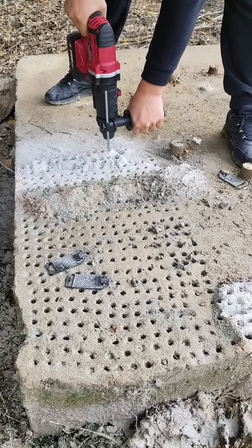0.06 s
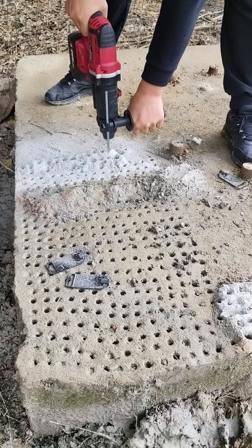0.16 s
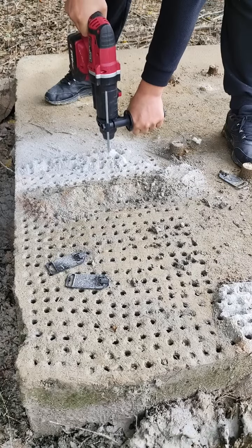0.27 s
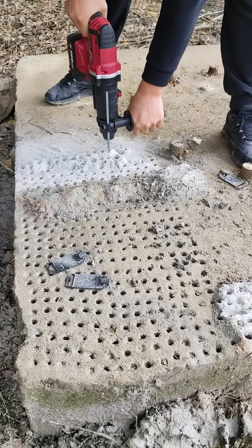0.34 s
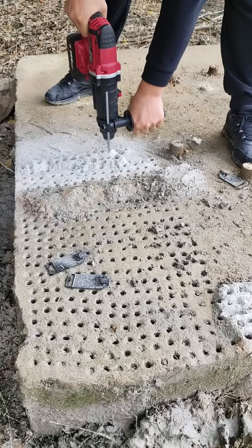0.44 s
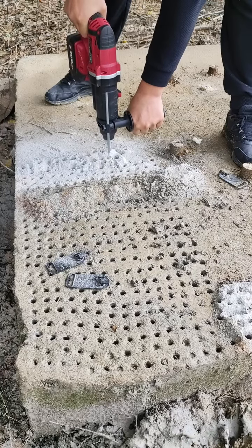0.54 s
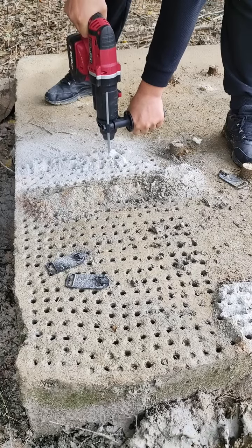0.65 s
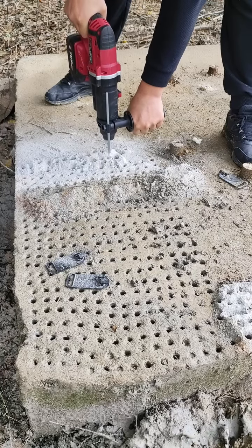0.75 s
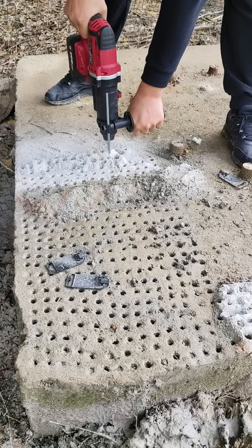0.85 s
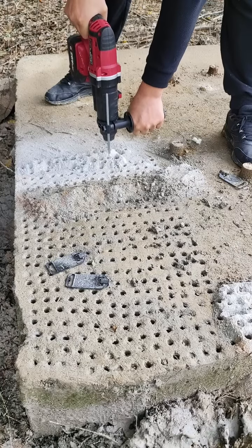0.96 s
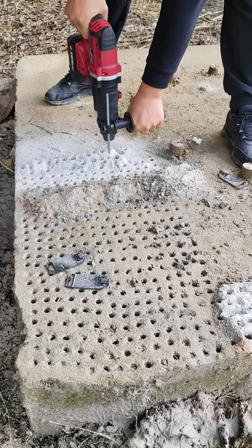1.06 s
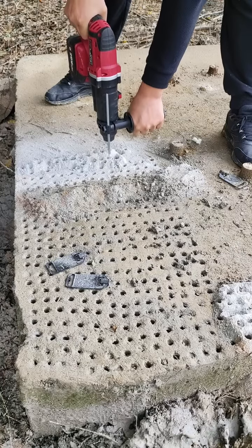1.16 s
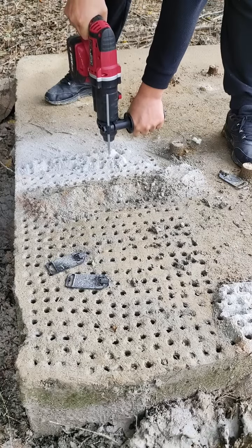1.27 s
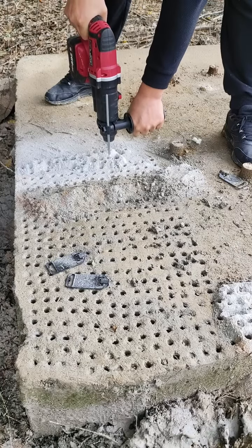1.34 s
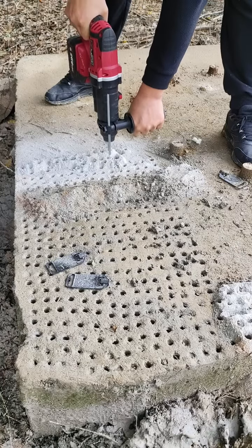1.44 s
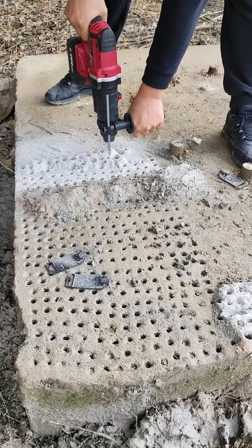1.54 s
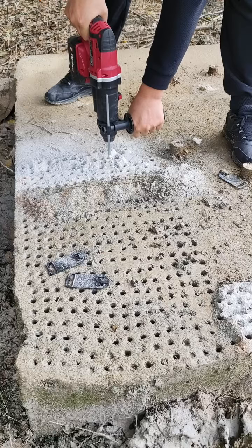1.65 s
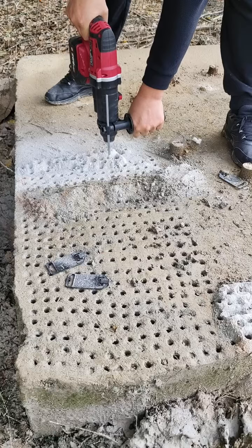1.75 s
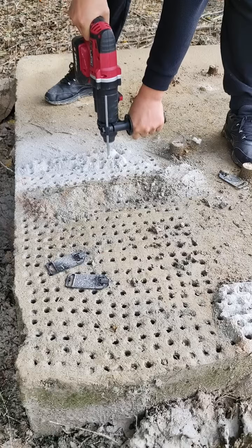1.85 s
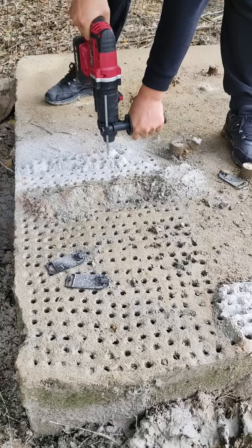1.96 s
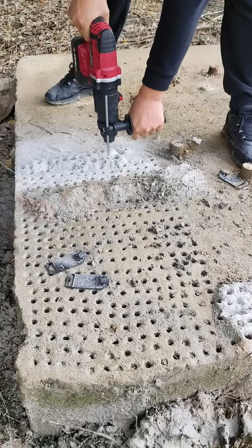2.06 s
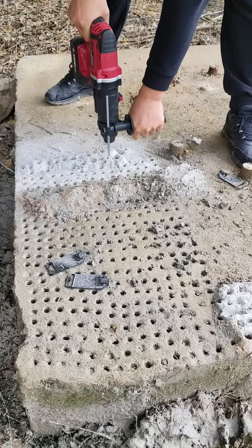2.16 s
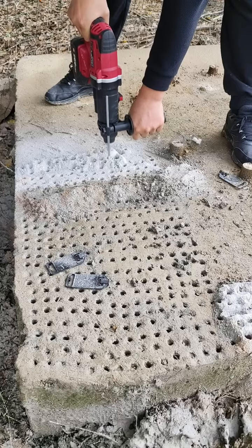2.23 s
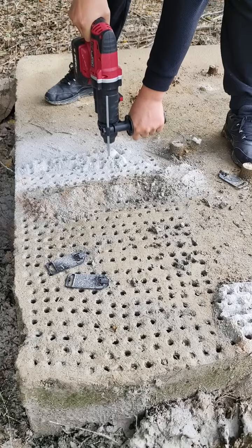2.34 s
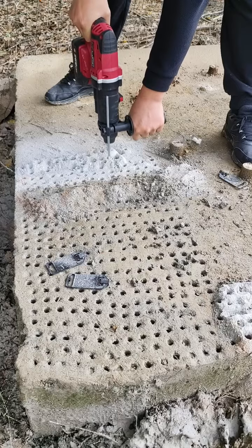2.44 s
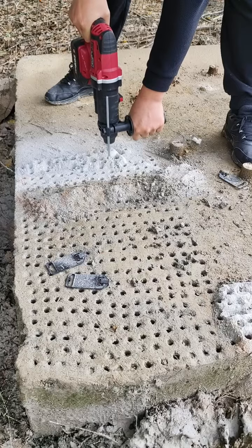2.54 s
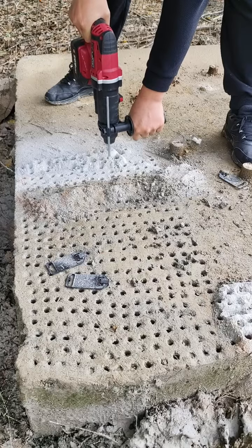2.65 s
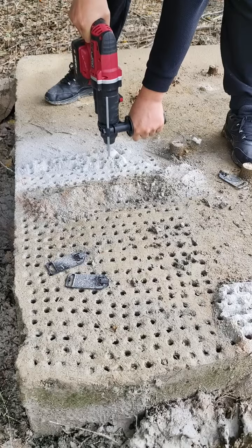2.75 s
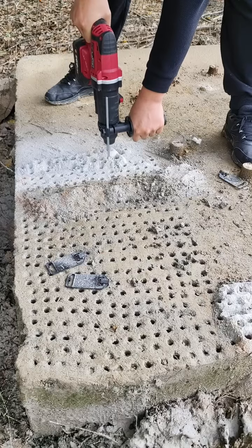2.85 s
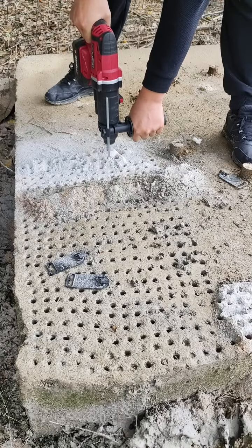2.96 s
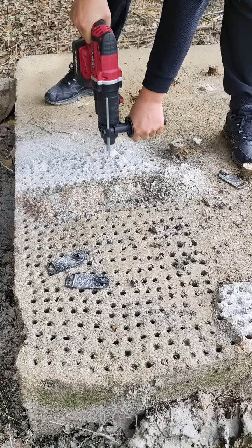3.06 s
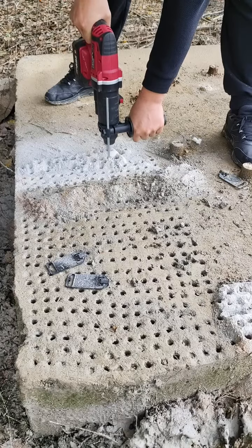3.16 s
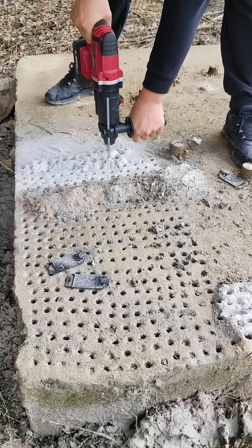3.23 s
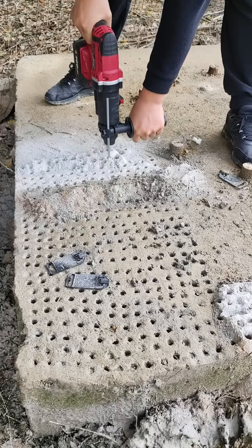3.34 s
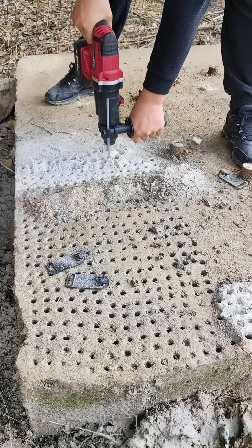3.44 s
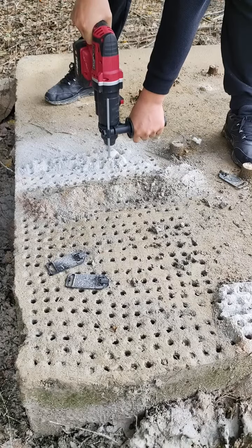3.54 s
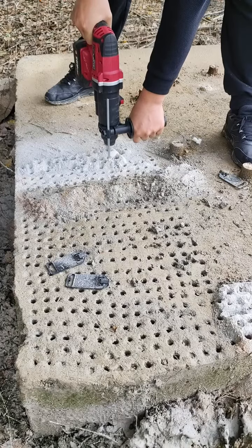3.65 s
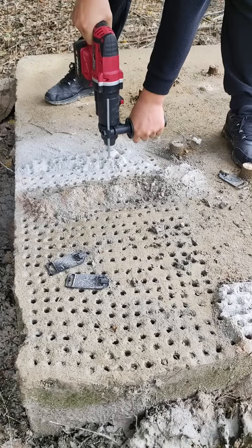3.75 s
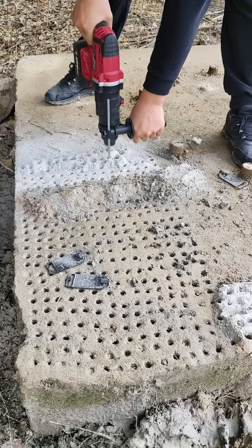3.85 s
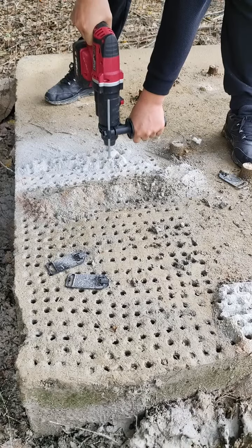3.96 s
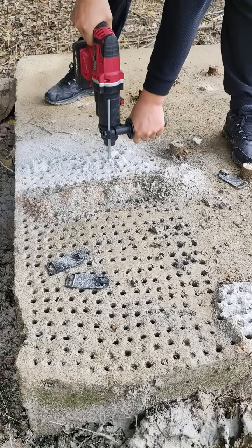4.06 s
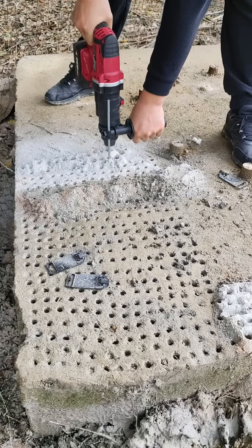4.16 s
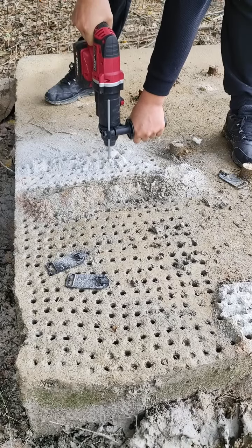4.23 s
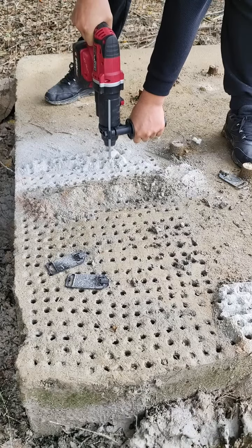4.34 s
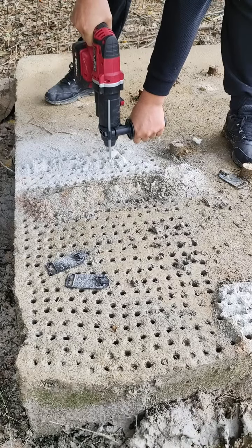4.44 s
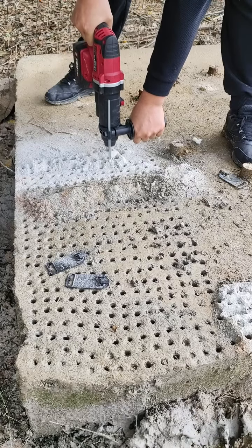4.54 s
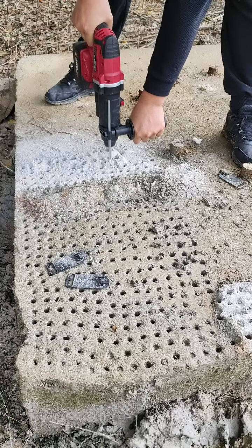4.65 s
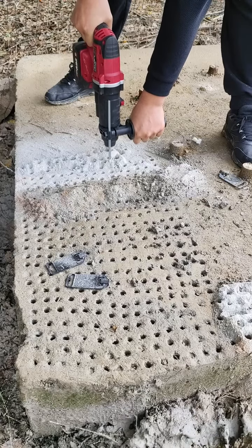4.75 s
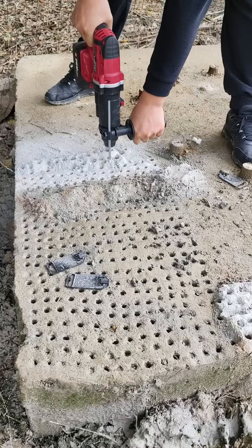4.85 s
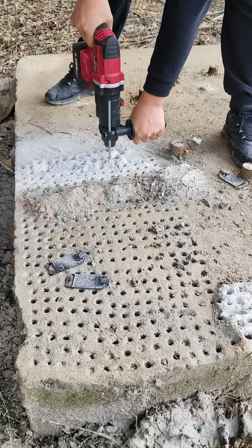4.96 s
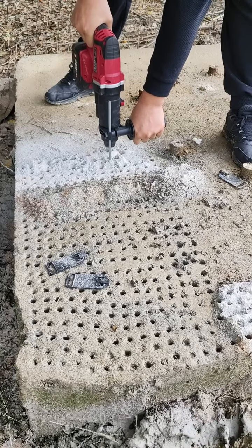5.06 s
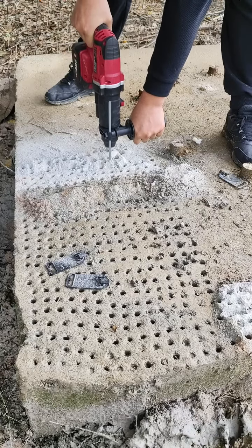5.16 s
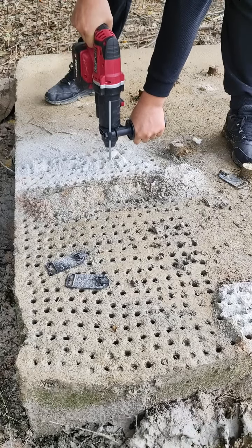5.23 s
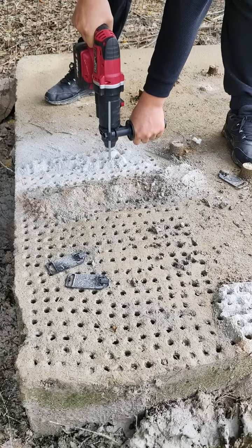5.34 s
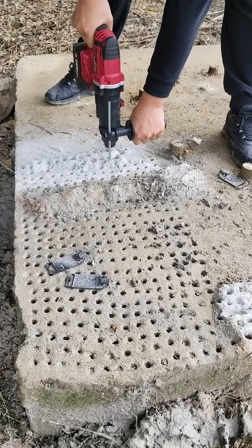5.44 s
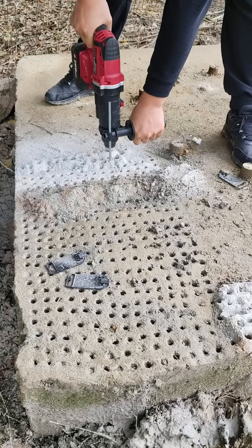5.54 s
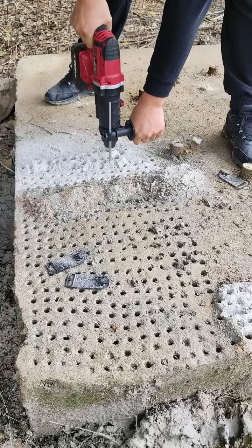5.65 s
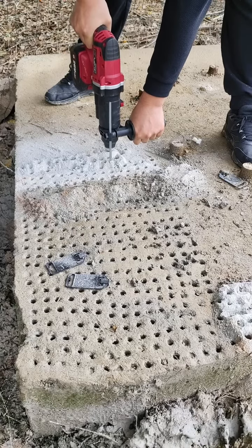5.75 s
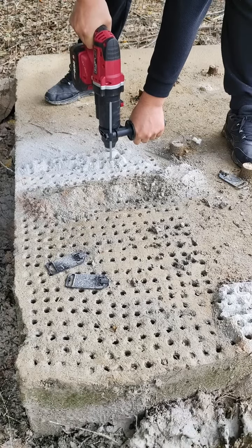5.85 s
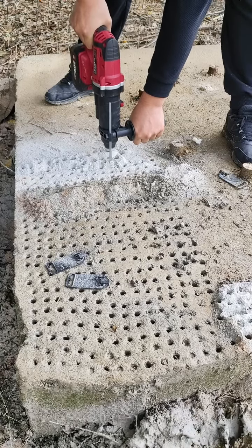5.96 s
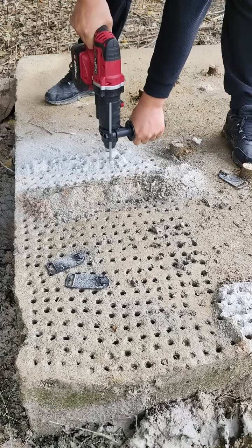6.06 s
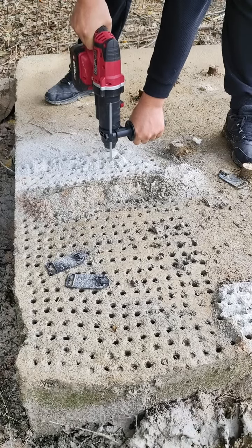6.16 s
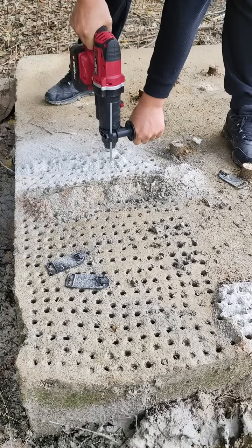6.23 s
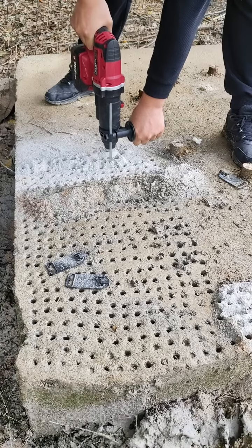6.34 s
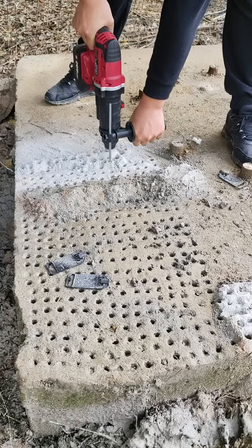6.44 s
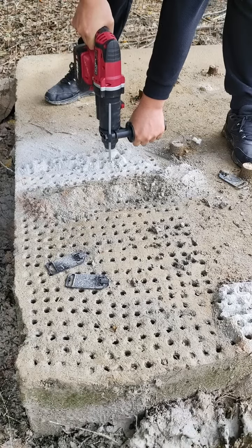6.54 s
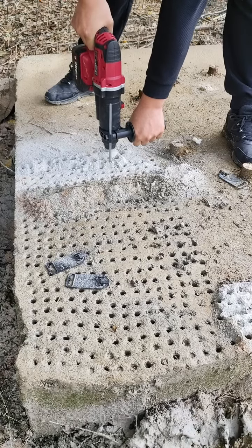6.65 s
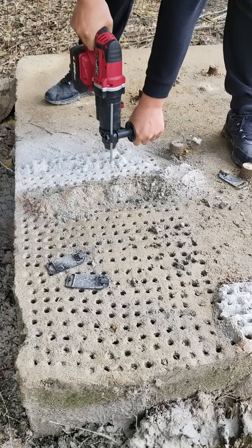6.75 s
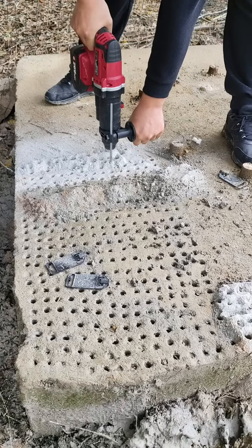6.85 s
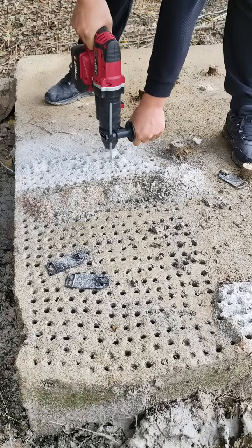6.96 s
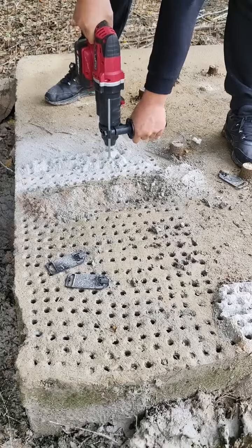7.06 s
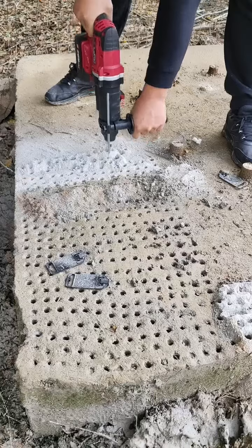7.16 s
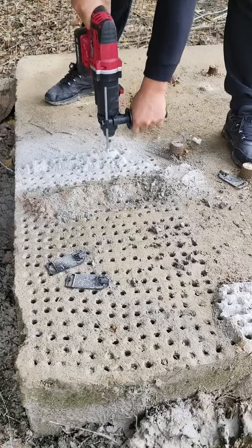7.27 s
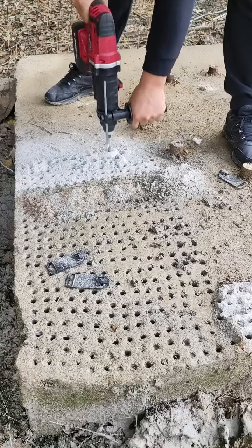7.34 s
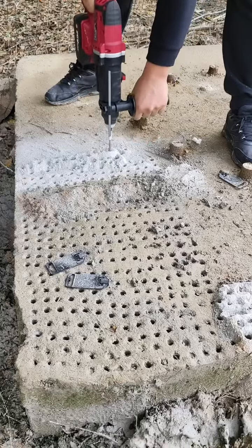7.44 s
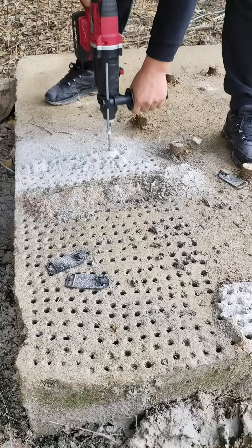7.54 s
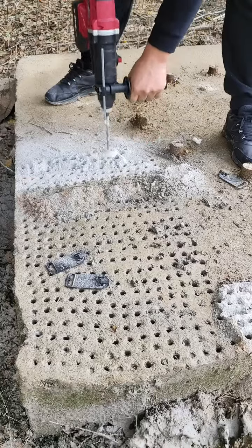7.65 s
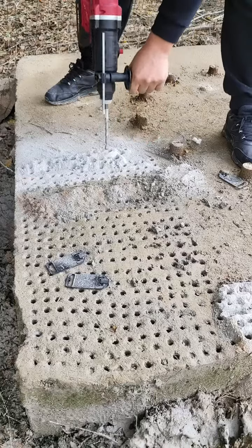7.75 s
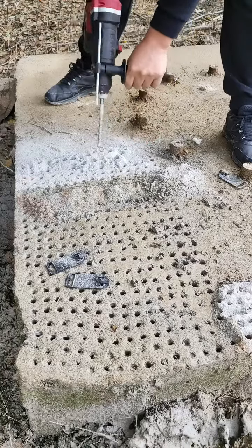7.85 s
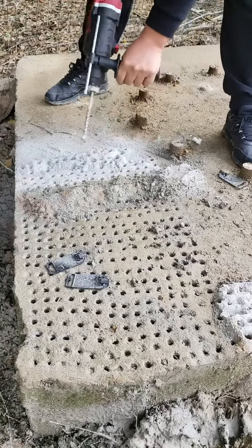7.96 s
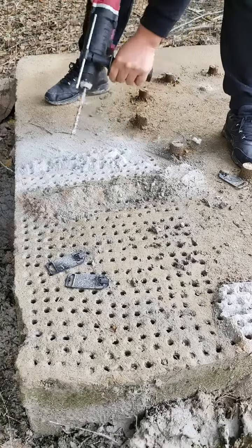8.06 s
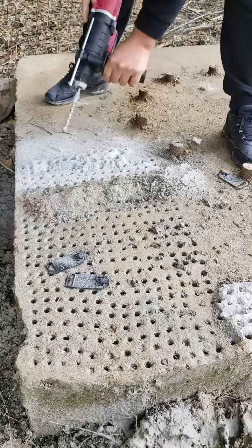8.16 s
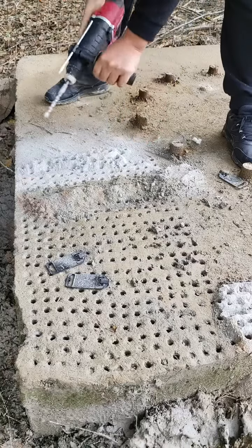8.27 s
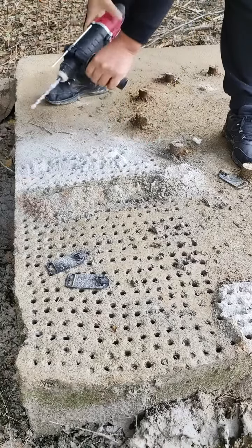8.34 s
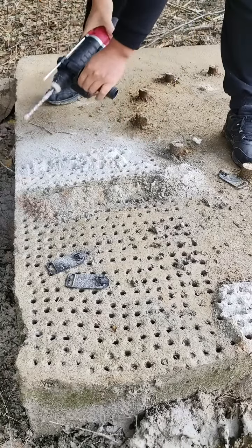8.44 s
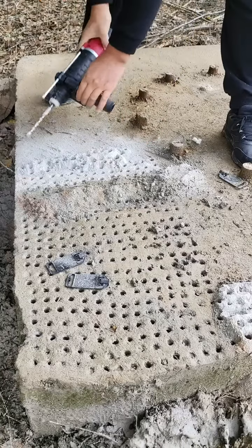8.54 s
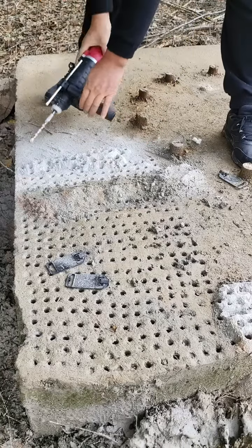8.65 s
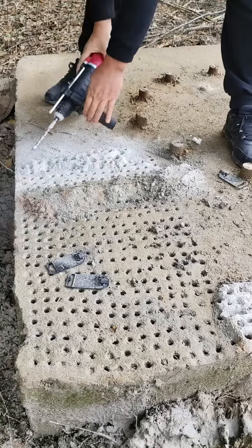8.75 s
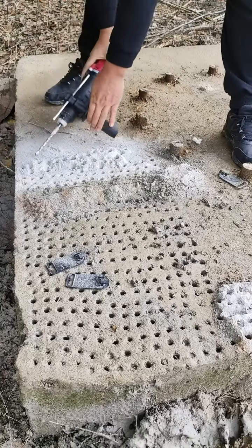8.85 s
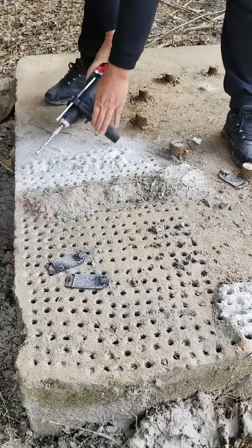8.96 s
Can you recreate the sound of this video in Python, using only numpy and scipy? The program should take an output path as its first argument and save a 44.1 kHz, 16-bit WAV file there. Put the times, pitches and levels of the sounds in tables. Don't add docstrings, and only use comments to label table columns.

```python
import sys
import numpy as np
from scipy import signal
from scipy.fft import rfft, irfft
from scipy.io import wavfile
from scipy.ndimage import uniform_filter1d

SR = 44100
rng = np.random.default_rng(int(sys.argv[2]) if len(sys.argv) > 2 else 0)


def magnitude_from_level(level_db):
    exponent = np.asarray(level_db, float) / 20
    return 10 ** exponent


def log_audio(samples):
    frames = np.atleast_2d(samples).T
    limited = np.clip(frames, -1, 1)
    pcm = np.round(limited * 32767).astype(np.int16)
    wavfile.write(sys.argv[1], SR, pcm)


N = 396900

SEATED_S, DEEP_S, BOTTOM_S, PULLED_S = 1.4, 5.95, 6.65, 7.13
COAST_S, BRAKE_S, STOP_S = 7.56, 7.62, 7.812

# start in seconds, end in seconds, edge in seconds, level in dB
SLACK = (7.25, 7.39, .04, -14)


def evened(x):
    return x / np.sqrt(np.mean(x ** 2) + 1e-20)


def curves(rows):
    s, *columns = np.transpose(rows)
    return [np.interp(np.arange(N) / SR, s, c) for c in columns]


def ramp(s, length):
    return np.clip((np.arange(N) / SR - s) / length, 0, 1)


def since(s):
    return np.maximum(np.arange(N) / SR - s, 0)


def peak_db(hz, centre_hz, width):
    return -24 * ((hz - centre_hz) / width) ** 2


def slow(hz):
    size = N // 20
    f = np.fft.rfftfreq(size, 20 / SR)
    spectrum = rfft(rng.standard_normal(size)) / (1 + (f / hz) ** 2)
    return evened(np.interp(np.arange(N) / 20, np.arange(size), irfft(spectrum, size)))


def noise(points, patchy_db):
    hz = np.fft.rfftfreq(1024, 1 / SR)
    a, b, patch = rng.standard_normal((N // 256 + 5, 513, 3)).T
    patch = evened(uniform_filter1d(uniform_filter1d(patch, 10, 0), 8, 1))
    f, db = np.transpose(points)
    shape_db = np.interp(np.log(hz + 1), np.log(f + 1), db)[:, None] + patchy_db * patch
    return evened(signal.istft((a + 1j * b) * magnitude_from_level(shape_db), nperseg=1024, noverlap=768)[1][:N])


def resonate(x, hz, width):
    turn = np.exp(2j * np.pi * np.cumsum(hz) / SR)
    r = np.exp(-np.pi * width / SR)
    return 2 * (turn * signal.lfilter([(1 - r) ** 2], [1, -2 * r, r * r], x / turn)).real


def ring(x, modes):
    t = np.arange(2048) / SR
    response = np.zeros(2048)
    for k, (hz, w, db) in enumerate(modes):
        swell = w * w * t * np.exp(-np.pi * w * t)
        response += (-1) ** k * magnitude_from_level(db) * swell * np.cos(2 * np.pi * hz * t)
    return evened(signal.oaconvolve(x, response)[:len(x)])


def split(x, low_db, high_db):
    low = signal.sosfiltfilt(signal.butter(2, 900, fs=SR, output="sos"), x)
    high = signal.sosfiltfilt(signal.butter(2, 6000, "high", fs=SR, output="sos"), x)
    return x + low * (magnitude_from_level(low_db) - 1) + high * (magnitude_from_level(high_db) - 1)


def yard():
    # frequency in Hz, level in dB per Hz
    air = [(20, -28.5), (45, -12), (90, -9), (190, -25), (500, -39.5), (950, -30), (1900, -40), (3500, -54),
           (5800, -62), (12000, -72.5)]
    # frequency in Hz, wander in Hz, level in dB
    hum_tones = [(53, 1.2, -61.5), (81, 2.0, -62.5), (105.6, 3.0, -72), (35, 2.0, -71.5)]
    # time in seconds, level in dB
    nearness = [
        (0, 3),
        (3, 9),
        (7.8, 4),
        (8.7, 0.5),
        (8.82, 7.5),
        (9, 10.5),
    ]
    air_db, ducked_db, gust_s, gust_db = -57, -4.5, 8.72, 6.5
    air_db = air_db + ducked_db * (1 - ramp(STOP_S, 0.089)) + gust_db * ramp(gust_s, 0.19)
    hum = np.zeros(N)
    for hz, wander, db in hum_tones:
        hum += magnitude_from_level(db + 3.7 * slow(5.4)) * np.cos(2 * np.pi * np.cumsum(hz + wander * slow(2.5)) / SR)
    return magnitude_from_level(air_db) * noise(air, patchy_db=2.0) + magnitude_from_level(curves(nearness)[0]) * np.sqrt(2) * hum


def bird():
    # start in seconds, length in seconds, level in dB, pitch in Hz
    chirps = [
        (8.612, .09, -81, 3620),
        (8.773, 0.18, -68, 4070),
    ]
    rise_s, fade_db, drop_hz = .015, -12, 30
    haze_hz, haze = 150, .45
    out = np.zeros(N)
    for s, length, db, pitch_hz in chirps:
        hz = pitch_hz + drop_hz * (1 - ramp(s, rise_s))
        fade = magnitude_from_level(db + fade_db * since(s + .04) / length)
        shape = ramp(s, rise_s) ** 2 * fade * (1 - ramp(s + length, .015))
        phase = 2 * np.pi * np.cumsum(hz + 15 * slow(120)) / SR
        blur = evened(resonate(rng.standard_normal(N), hz + haze_hz, 450))
        whistle = 1.1 * np.cos(phase) + .04 * np.cos(2 * phase)
        out += shape * magnitude_from_level(2.9 * slow(50)) * (whistle + haze * blur)
    return out


def hands():
    # centre in seconds, length in seconds, frequency in Hz, width in Hz, level in dB
    rustles = [
        (8.22, .07, 7000, 1500, -88),
        (8.53, .1, 8100, 5000, -87),
        (5, 0.03, 750, 900, -57),
        (8.84, .09, 5000, 3000, -86),
    ]
    # time in seconds, peak in dB, frequency in Hz
    click_rows = [
        (7.812, -33, 5000),
        (8.897, -63, 1800),
        (8.908, -67, 7000),
    ]
    t, out = np.arange(N) / SR, np.zeros(N)
    for s, length, hz, width, db in rustles:
        brush = ring(rng.standard_normal(N), [(hz, width, 0)])
        out += magnitude_from_level(db) * brush * np.exp(-((t - s) / length * 2) ** 2)
    for s, db, hz in click_rows:
        tick = ring(rng.standard_normal(N), [(hz, 9000, 0)])
        out += magnitude_from_level(db) * tick * (t > s) * np.exp(-since(s) / 0.0033)
    return out


def freed_bit():
    sing_hz, sing_db, swell_db = 2316, -46, 4.5
    held = ramp(PULLED_S + .05, .04) - ramp(BRAKE_S - .02, .03)
    level = magnitude_from_level(sing_db + swell_db * ramp(SLACK[1], .06))
    return held * level * ring(rng.standard_normal(N), [(sing_hz, 50, 0)])


def brake():
    groan_hz, bite_hz, settle_s = 1160, 400, 0.028
    groan_db, stop_db_per_s = -36.5, 750
    hz = groan_hz + bite_hz * np.exp(-since(BRAKE_S + .025) / settle_s)
    held = ramp(BRAKE_S, 0.02) * magnitude_from_level(groan_db - stop_db_per_s * since(STOP_S))
    return held * evened(resonate(rng.standard_normal(N), hz, 320))


def gears(rate, turns, load):
    # multiple of the blow rate, shake in Hz, blur width in Hz, clean share 0-1
    teeth = [(57.84, 24, 150, 0.9), (115.3, 80, 300, .25), (144.3, 80, 320, 0.2)]
    # frequency in Hz, width in Hz, level in dB
    housing_modes = [(3700, 200, -42), (3860, 200, -46), (4250, 480, -36.5), (7450, 1000, -47),
                     (8600, 400, -50), (9460, 640, -44.5)]
    floor_db, flutter_db = -57, 1.5
    off_s, off_db_per_s = 7.69, 231
    race_db, race_full = 2.5, 40
    start, end, edge, slack_db = SLACK
    mesh_db = slack_db * (ramp(start, edge) - ramp(end, edge)) - off_db_per_s * since(off_s)
    speeding = uniform_filter1d(np.gradient(rate) * SR, size=1500)
    mesh_db += race_db * np.clip(speeding / race_full, 0, 1) * (1 - ramp(start, edge))
    scale = np.arange(0, SR / 2, 10)
    housing = magnitude_from_level(floor_db) + sum(magnitude_from_level(db + peak_db(scale, hz, w)) for hz, w, db in housing_modes)
    out = np.zeros(N)
    for k, shake_hz, width, clean in teeth:
        through = np.interp(k * rate, scale, housing)
        tone = np.sqrt(2) * np.cos(2 * np.pi * np.cumsum(k * rate + shake_hz * slow(90)) / SR)
        smear = evened(resonate(rng.standard_normal(N), k * rate, width))
        pulse_db = 4 * load * np.cos(2 * np.pi * (turns - rng.random()))
        whine = np.sqrt(clean) * tone + np.sqrt(1 - clean) * smear
        out += through * magnitude_from_level(mesh_db + pulse_db + flutter_db * slow(25)) * whine
    return out


def piston(rate, turns, load):
    # multiple of the blow rate, level in dB
    loaded = [(1, -8.5), (2, -1.1), (3, -2), (4, 1.9), (5, -10.5), (6, -11.5), (7, -4), (8, 2), (9, 4.5),
              (10, -4), (11, 3), (12, -10.5)]
    # multiple of the blow rate, level in dB
    unloaded = [(1, 1.5), (2, -26.5), (3, -8), (4, -21.5), (5, -10.5), (6, -19.5), (7, -23.5), (8, -23.5),
                (9, -17.5), (10, -21), (11, -19), (12, -23.5)]
    slab_orders = (7, 10, 11, 12)
    loaded_db, free_db = -49.5, -46
    slab_hz, slab_width, slab_db, loose_db, slab_floor_db = 726, 30, 5, -7, -10
    tuned_db = np.maximum(slab_db + peak_db(11 * rate, slab_hz, slab_width), slab_floor_db)
    lift_db = np.minimum(tuned_db, loose_db + 40 * since(SEATED_S))
    out = np.zeros(N)
    for (k, on_db), (_, off_db) in zip(loaded, unloaded):
        striking = load * magnitude_from_level(on_db + loaded_db + (k in slab_orders) * lift_db)
        idling = (1 - load) * magnitude_from_level(off_db + free_db)
        wave = np.cos(2 * np.pi * (k * turns + rng.random()))
        out += np.sqrt(2) * (striking + idling) * magnitude_from_level(.8 * slow(5)) * wave
    return out


def hammer(turns, load):
    # place in turns, level in dB, timing spread in 1/400 s
    cycle = [
        (0, 0, .04),
        (.86, -9, .1),
        (.22, -9, .3),
    ]
    # frequency in Hz, width in Hz, level in dB
    knock = [(1530, 1130, 3), (4000, 2400, -8)]
    # frequency in Hz, width in Hz, level in dB
    snap = [(7400, 1800, -3), (11940, 1200, -10.5)]
    # frequency in Hz, width in Hz, level in dB
    bit = [(612, 222, 2), (754, 170, 2.5), (1255, 330, 3), (1510, 210, 4.5), (2050, 230, 7),
           (2320, 250, 2.5), (3940, 630, -7), (7800, 1500, -18.5)]
    # frequency in Hz, width in Hz, level in dB
    case = [(1300, 110, -2), (1578, 80, 0), (2005, 200, -6.5), (2256, 100, -1.5), (4067, 300, -3.5),
            (736, 32, -11.5)]
    # frequency in Hz, level in dB per Hz
    grit_tone = [(60, -21.5), (160, -15), (380, -17.5), (520, -6), (980, -6), (1310, -4), (2250, -3),
                 (2700, -3), (3400, -4), (4100, -5.5), (5000, -7), (9600, -10.5), (10800, -17),
                 (11900, -12)]
    # frequency in Hz, level in dB per Hz
    spin_tone = [(60, -24.5), (160, -26.5), (380, -15), (520, -9), (980, -3.5), (1400, -2), (2200, -1),
                 (3000, -5.5), (4200, -1), (5500, -9), (8700, -12.5), (10800, -15), (11900, -14)]
    blow_db, snap_db, ring_db = -7, -19.5, -12
    grit_db, spin_db, case_db = -2.5, 1.1, -6
    clicks, snaps = np.zeros((2, N))
    for turn, db, spread in cycle:
        at = np.flatnonzero(np.diff(np.floor(turns - turn)) > 0)
        late, force, split_force = rng.standard_normal((3, len(at)))
        at = np.clip(at + (spread * 110 * late).astype(int), 0, N - 1)
        clicks[at] += magnitude_from_level(db + 1.8 * force) * load[at]
        snaps[at] += magnitude_from_level(db + 4.5 * np.minimum(split_force, 2)) * load[at]
    burst = np.exp(-np.arange(600) / SR / .0018)
    chips = signal.oaconvolve(clicks, burst)[:N] * rng.standard_normal(N)
    crack = signal.sosfilt(signal.butter(2, 800, "high", fs=SR, output="sos"), ring(clicks, knock))
    strikes = -magnitude_from_level(blow_db) * crack - magnitude_from_level(snap_db) * ring(snaps, snap) + magnitude_from_level(ring_db) * ring(chips, bit)
    grit = np.sqrt(load) * noise(grit_tone, patchy_db=1.1)
    grit += np.sqrt(1 - load) * magnitude_from_level(spin_db) * noise(spin_tone, patchy_db=2.05)
    grit += np.sqrt(load) * magnitude_from_level(case_db) * ring(rng.standard_normal(N), case)
    pulse_db = 1.48 * load * np.cos(2 * np.pi * (turns - .1))
    return strikes + magnitude_from_level(grit_db + 0.76 * slow(48) + pulse_db) * grit


def tool():
    # time in seconds, rate in blows per s
    drive = [(0, 66.3), (1.0, 63.9), (1.45, 63.2), (1.95, 66.5), (2.5, 65.5), (3.1, 66.3), (4.0, 65.7),
             (5.6, 63.4), (6.1, 61.8), (6.5, 61.0), (6.9, 60.7), (7.02, 62.4), (7.11, 66), (7.2, 71.6),
             (7.28, 74.6), (7.36, 72.5), (7.43, 75.0), (7.52, 73.2)]
    # time in seconds, level in dB
    loudness = [
        (0, -29),
        (1.3, -28.5),
        (1.8, -28),
        (3.2, -28),
        (4.4, -28.5),
        (5.3, -28.5),
        (6.6, -29.5),
        (7.0, -30),
        (7.2, -28.5),
        (7.55, -28),
    ]
    slowing = 215
    bite, wear, packed, lifted = 0.91, 0.12, 0.23, 0.4
    coast_db_per_s, stop_db_per_s = 25.5, 346
    base_boom_db, boom_seated_db, boom_bottom_db, boom_free_db = -6, 1, 5, 0.5
    base_treble_db, treble_deep_db, treble_free_db, treble_brake_db = -3.5, 0, -3, 3

    rate = np.maximum(curves(drive)[0] - slowing * since(COAST_S) ** 2, 40)
    turns = np.cumsum(rate * (1 + .003 * slow(6))) / SR
    deep, free = ramp(DEEP_S, PULLED_S - DEEP_S), ramp(PULLED_S, 0.018)
    load = np.clip(bite - wear * ramp(0, DEEP_S) - packed * deep - lifted * free, 0, 1)
    level_db = curves(loudness)[0] - coast_db_per_s * since(COAST_S) - stop_db_per_s * since(STOP_S)

    seated = ramp(SEATED_S, .4) - ramp(SEATED_S + 2.4, .6)
    in_hole_db = boom_seated_db * seated + boom_bottom_db * ramp(BOTTOM_S, 0.21)
    boom_db = base_boom_db + in_hole_db * (1 - free) + boom_free_db * free
    treble_db = base_treble_db + treble_deep_db * deep + treble_free_db * free
    treble_db += treble_brake_db * ramp(COAST_S, 0.09)
    body = split(hammer(turns, load), boom_db + 9, treble_db + 6.5)
    running = np.clip(magnitude_from_level(level_db + 27.5), 0, 1)
    shaft = running * piston(rate, turns, load) + gears(rate, turns, load)
    return magnitude_from_level(level_db + .5) * body + shaft + brake() + freed_bit()


def echo(x):
    t = np.arange(SR // 2) / SR
    tail = rng.standard_normal(len(t)) * magnitude_from_level(-60 * t / 0.29) * (t > .006)
    tail = signal.sosfilt(signal.butter(2, 900, "high", fs=SR, output="sos"), tail)
    return signal.fftconvolve(x, tail / np.linalg.norm(tail))[:N]


def scene():
    drill = tool()
    return (drill + magnitude_from_level(-13.5) * echo(drill) + yard() + bird() + hands())[None]


def starve(x):
    # frequency in Hz, chance 0-1 that a band is dropped
    dropouts = [(2500, 0), (3500, .006), (6000, .012), (7500, .003), (8800, .03), (9600, .005),
                (10300, .12), (11100, .18), (11700, .02)]
    hz, _, z = signal.stft(x, SR, nperseg=1024, boundary="even", padded=True)
    draw = rng.random((len(hz) // 8 + 1, z.shape[1] // 2 + 1))
    draw = np.repeat(np.repeat(draw, 8, axis=0), 2, axis=1)[:len(hz), :z.shape[1]]
    dropped = draw < np.interp(hz // 345 * 345, *np.transpose(dropouts))[:, None]
    return signal.istft(z * np.where(dropped, .05, 1), SR, nperseg=1024)[1][:N]


def top_cut(x):
    return signal.sosfilt(signal.butter(12, 13370, fs=SR, output="sos"), x)


def record(dry):
    heard = starve(signal.sosfilt(signal.butter(3, 38, "high", fs=SR, output="sos"), dry[0]))
    edge = signal.firwin(1023, 12110, window=("kaiser", 10), fs=SR)
    padded = np.pad(heard, len(edge) // 2, "reflect")
    mix = signal.oaconvolve(padded, edge, "valid")[None]
    return top_cut(mix)


dry = scene()
out = record(dry)
log_audio(out)
```